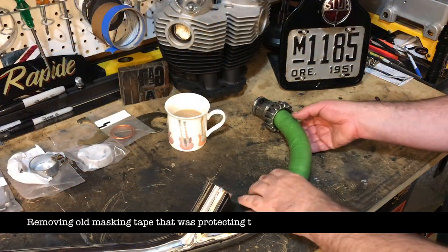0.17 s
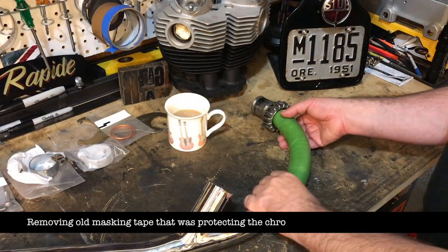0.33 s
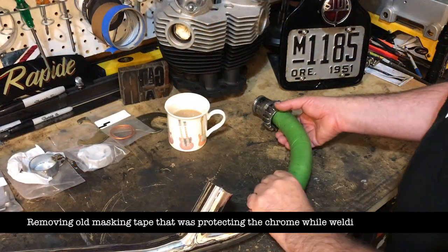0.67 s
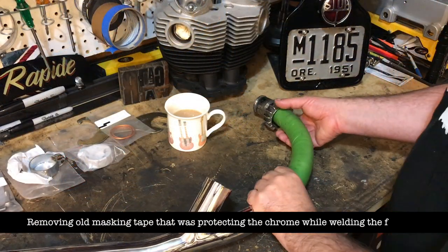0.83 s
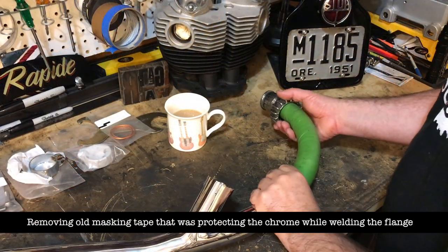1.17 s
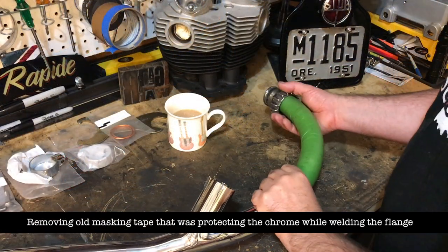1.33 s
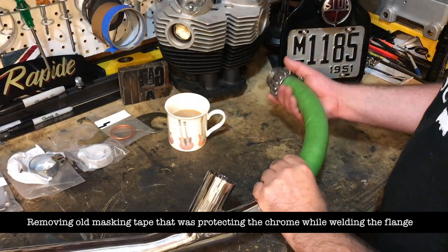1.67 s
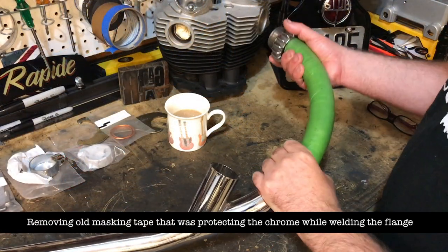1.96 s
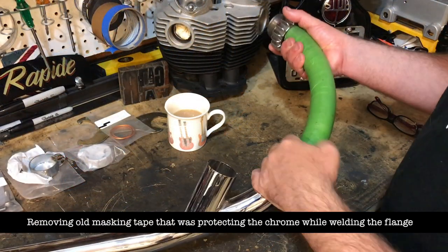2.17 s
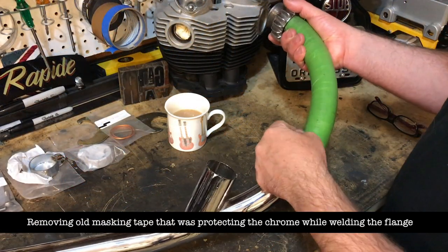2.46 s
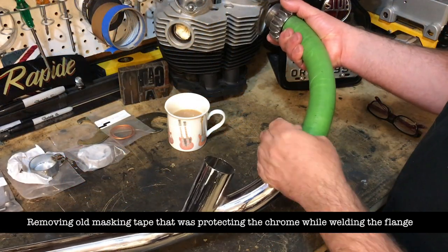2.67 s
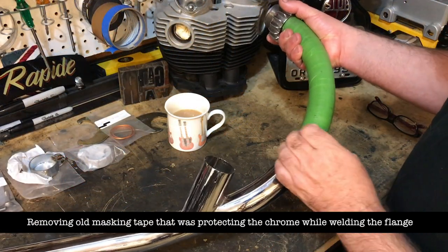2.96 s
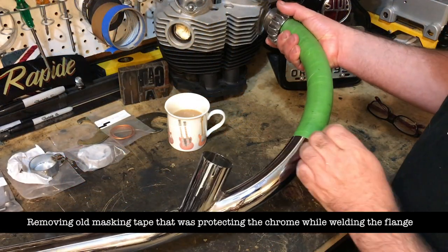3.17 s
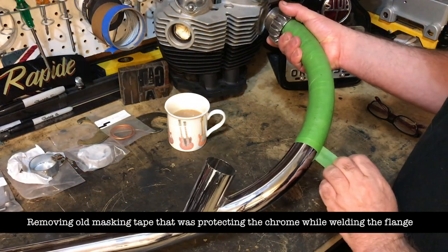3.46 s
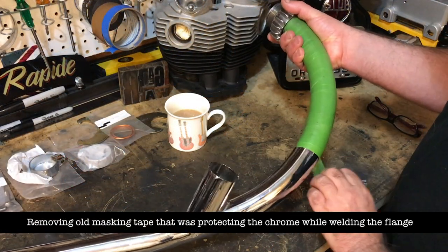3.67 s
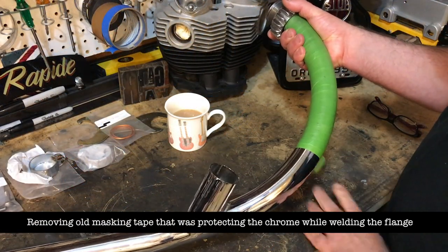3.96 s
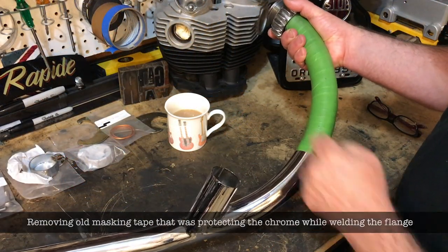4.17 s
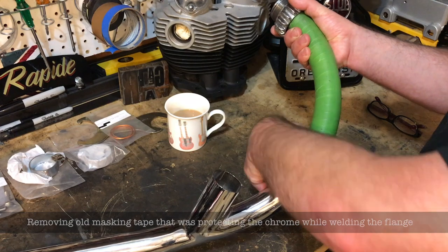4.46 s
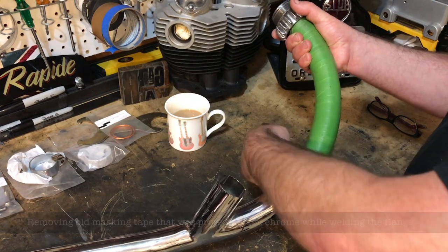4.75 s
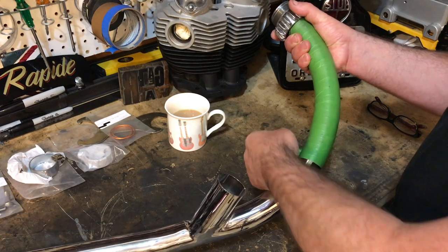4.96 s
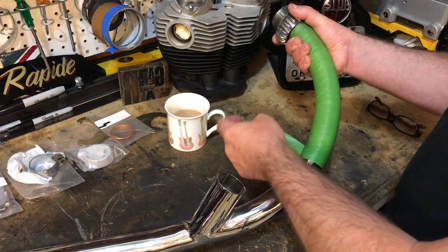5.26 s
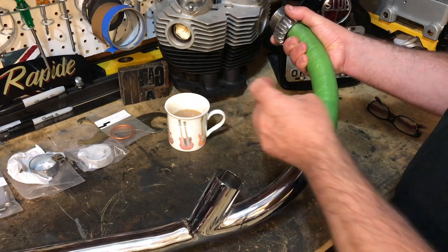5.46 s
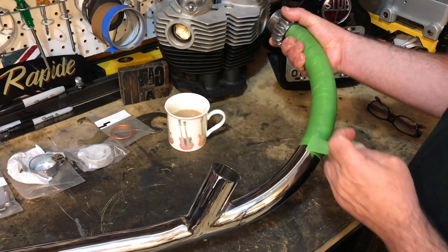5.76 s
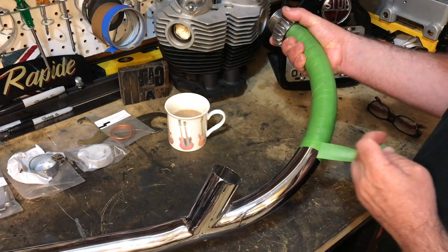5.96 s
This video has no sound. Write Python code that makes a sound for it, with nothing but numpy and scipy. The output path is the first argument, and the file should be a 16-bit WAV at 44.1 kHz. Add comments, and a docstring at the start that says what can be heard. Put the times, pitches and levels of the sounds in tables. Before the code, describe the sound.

A pipe knocks on a workbench and clinks, then old tape rips away from it in two runs of short, rasping pulls.

```python
"""A workbench in a small, quiet workshop; one microphone, close to the work.
Over room air and a deep drone, fingers rub old masking tape on a chromed pipe. The pipe knocks on the
bench, and its loose flange rattles as it is lifted. Fingers pick an edge free, then come the pulls:
glue threads snap by the thousand and ring the freed strip, whose pitch sinks as it lengthens.
Near 3.9 s the tape tears off; at 5 s a fresh end is taken up and peeled."""
import sys
import numpy as np
from scipy import signal
from scipy.fft import rfft, irfft
from scipy.io import wavfile
from scipy.ndimage import uniform_filter1d

SR = 44100
rng = np.random.default_rng(int(sys.argv[2]) if len(sys.argv) > 2 else 0)


def dump(signal):
    """Clip the signal to [-1, 1] and save it as 16-bit WAV at the path in sys.argv[1]."""
    limited = np.clip(np.atleast_2d(signal).T, -1, 1)
    pcm = np.round(limited * 32767).astype(np.int16)
    wavfile.write(sys.argv[1], SR, pcm)


N = 269892
TIME = np.arange(N) / SR

# spectrum of snapping glue threads: freq_hz, density_db
GLUE_SPECTRUM = [(1500, -49), (4000, -17), (6500, -12), (8500, 2.5), (10200, 5.5), (12000, 3.5),
                 (14000, -1), (16000, -7)]
# the hand's tugs at the tape, with rasp and ring relative to the fizz:
# start_s, hold_s, rise_s, fizz_db, growth_db, rasp_db, ring_db, strip_pitch_hz
TAPE_TUGS = [(2.82, 0.13, 0.034, -67.5, -5, -7.5, -15.5, 2970),
             (3.001, 0.087, 0.042, -61, 0.5, -9, -7, 2080), (3.16, 0.13, 0.12, -58, 3.5, -4, -16, 1250),
             (3.398, .1, 0.074, -54, 4, -3, -16.5, 843), (3.6, 0.098, 0.014, -49, 2.5, -4, -18, 810),
             (3.802, 0.16, 0.0096, -67.5, -11, -3, -27.5, 467),
             (5.022, 0.098, 0.022, -61, 4, -4, -21.5, 1740),
             (5.126, .13, 0.02, -48.3, -2, -3.5, -14.5, 1000),
             (5.328, 0.13, 0.041, -58, -1, -3.5, -21, 380), (5.538, 0.19, 0.054, -63.5, -1.5, -6, -23, 444),
             (5.752, 0.061, .03, -66.5, 3.5, -4.5, -19.5, 420),
             (6.014, 0.06, 0.056, -53, -6, -4.5, -19.5, 353)]


def amp(db):
    """Decibels to gain."""
    return 10 ** (np.asarray(db) / 20)


def unit(x):
    """Scales to rms 1."""
    return x / np.sqrt(np.mean(x ** 2) + 1e-20)


def read(points, hz):
    """Reads a table on a log-frequency axis."""
    freq_hz, value = np.transpose(points)
    return np.interp(np.log(hz + 1), np.log(freq_hz + 1), value)


def add(mix, start_s, sound):
    """Mixes a sound in at start_s."""
    part = mix[round(start_s * SR):][:len(sound)]
    part += sound[:len(part)]


def colour(x, spectrum, size=4096):
    """Causal filter of unit energy with the given spectrum."""
    gain_db = np.maximum(read(spectrum, abs(np.fft.fftfreq(size, 1 / SR))), -100)
    minimum_phase = np.exp(np.conj(signal.hilbert(np.log(amp(gain_db)))))
    taps = np.fft.ifft(minimum_phase).real[:size // 2]
    return signal.oaconvolve(x, taps / np.linalg.norm(taps))[:len(x)]


def noise(spectrum):
    """Steady noise of rms 1 from rows of freq_hz, density_db."""
    gain = amp(read(spectrum, np.fft.rfftfreq(N, 1 / SR)))
    return unit(irfft(rfft(rng.standard_normal(N)) * gain, N))


def dying(t60s):
    """One second of noise in which each band dies at its own speed."""
    hz, t, bands = signal.stft(rng.standard_normal(SR), SR, nperseg=256)
    decay = amp(-60 * t / read(t60s, hz)[:, None])
    return signal.istft(bands * decay, SR, nperseg=256)[1][:SR]


def burst(decay_s):
    """A dying scatter of tiny contacts, of unit energy."""
    t = TIME[:SR // 4]
    scatter = rng.standard_normal(len(t)) * np.exp(-t / decay_s)
    return scatter / np.linalg.norm(scatter)


def swell(start_s, length_s):
    """A bell-shaped envelope centred on the given span."""
    return np.exp(-((TIME - start_s) / length_s - .5) ** 2 / 0.48)


def ring(modes):
    """Dying sines of a struck body; neighbouring modes start in opposite directions."""
    t = TIME[:SR]
    return sum((-1) ** k * amp(db - 60 * t / t60) * np.sin(2 * np.pi * hz * t)
               for k, (hz, db, t60) in enumerate(modes))


def resonate(x, hz, width_hz):
    """A steep-skirted resonance whose pitch and width follow curves; rms 1."""
    turn = np.exp(2j * np.pi * np.cumsum(hz) / SR)
    shifted = x / turn * np.sqrt(width_hz)  # the resonance now sits at 0 Hz
    clock = np.cumsum(width_hz) / SR  # time counted in bandwidths, so one low-pass serves every width
    grid = np.arange(0, clock[-1], 1 / 16)
    steps = np.diff(np.interp(grid, clock, np.cumsum(shifted)), prepend=0)
    smooth = signal.lfilter(*signal.butter(2, 1 / 16), steps)
    return unit((turn * np.interp(clock, grid, smooth)).real)


def grains(per_s, spread_db, flutter_db):
    """Tiny snaps of uneven size that come in clumps."""
    sizes = amp(spread_db * np.minimum(rng.exponential(1, N), 4)) * rng.choice([-1, 1], N)
    clumps = unit(uniform_filter1d(uniform_filter1d(rng.standard_normal(N), size=180), size=120))
    fires = rng.random(N) < per_s / SR
    return unit(sizes * fires * amp(flutter_db * clumps))


def room_tone():
    """Room air, slow pressure drift, a faint whirr and a deep, wavering drone."""
    # the air and its slow pressure drift: freq_hz, density_db
    air_spectrum = [(30, -24.5), (50, -17.5), (70, -17), (100, -18), (150, -25), (220, -27.5), (400, -35),
                    (650, -37.5), (900, -39), (1800, -40.5), (2700, -43.5), (10000, -45.5), (16000, -51.5)]
    drift_spectrum = [(3, -12), (10, 0), (18, -8), (28, -14.5), (40, -35), (100, -65)]
    # the drone dips or swells for a while: start_s, length_s, change_db
    drone_swells = [(1.198, 1.2, -4), (2.49, 0.43, 4.5), (4.12, .16, 5.5)]
    drone_hz = 30 + 1.01 * noise([(1, 0), (4, -6), (10, -40), (30, -120)])
    wander_db = 2.5 * noise([(1, 0), (4, -3), (8, -40), (30, -120)])
    surge_db = sum(db * swell(start_s, length_s) for start_s, length_s, db in drone_swells)
    drone = np.sqrt(2) * np.sin(2 * np.pi * np.cumsum(drone_hz) / SR)
    drone *= amp(-57.5 + surge_db + wander_db)
    drift = amp(-55.5) * noise(drift_spectrum)
    whirr = amp(-89.5) * resonate(rng.standard_normal(N), hz=np.full(N, 722), width_hz=np.full(N, 25.))
    return amp(-71) * noise(air_spectrum) + drift + whirr + drone


def fingers():
    """Skin slides over the crepe paper, then picks at its edge, where the glue adds a bright fizz."""
    # finger strokes on the tape: start_s, length_s, level_db, glue_power_share (0-1)
    rubs = [(0.128, 0.44, -74, 0), (1.11, 0.064, -72, 0.66), (2.088, 0.045, -76.5, 0.9),
            (2.287, 0.027, -74, 1), (2.367, 0.056, -74.5, 0.5), (2.458, 0.033, -71.5, 0.45),
            (2.549, .035, -68.5, 0.84), (2.61, 0.044, -66.5, 0.85), (2.695, 0.059, -57.5, 0.95),
            (4.078, 0.086, -68.5, 0.34), (4.433, 0.042, -64, 0.63), (4.61, 0.022, -66.5, 0.2),
            (4.654, 0.03, -70, 0), (4.77, 0.23, -70.5, 0.46), (5.668, 0.032, -57.5, 0.88)]
    # crackles as a new edge lifts: start_s, level_db, length_s
    crackles = [(2.572, -72, 0.01), (3.586, -58, 0.01), (4.383, -64, 0.0036), (4.591, -65, 0.004),
                (4.745, -56, 0.019), (4.759, -57.5, 0.04), (4.861, -57.5, 0.0095), (4.891, -56, 0.009)]
    # skin on paper, and the lifting edge: freq_hz, density_db
    skin_spectrum = [(240, -27), (400, 3.5), (730, -15.5), (1040, -15), (1220, -7.5), (3020, -5),
                     (10900, 0), (16000, -14.5)]
    edge_spectrum = [(290, -45), (500, -22), (1360, -5.5), (1510, -5), (2390, -15), (2690, -15),
                     (7210, 0.5), (12100, 1), (16000, -14)]
    grit = grains(per_s=4700, spread_db=2.0, flutter_db=0.5)
    tack = grains(per_s=3000, spread_db=-0.5, flutter_db=1.6)
    skin, glue = colour(grit, skin_spectrum), colour(tack, GLUE_SPECTRUM)
    picks = sum(amp(db) * swell(start_s, length_s) for start_s, db, length_s in crackles)
    out = picks * colour(grit, edge_spectrum)
    for start_s, length_s, db, sticky in rubs:
        out += amp(db) * swell(start_s, length_s) * (np.sqrt(1 - sticky) * skin + np.sqrt(sticky) * glue)
    return out


def bench_knock():
    """The pipe rings the bench as it lands; the things lying on it jump and blur the tail."""
    # the pipe lands and settles: start_s, relative_db
    knocks = [(.464, 3), (0.47, 1), (0.4827, -7.5)]
    # modes of bench and pipe: pitch_hz, relative_db, t60_s
    bench_modes = [(76.4, -37, 0.64), (92.7, -40, 0.35), (129.5, -38, 0.32), (147, -39.5, 0.36),
                   (186, -52.5, 0.82), (223, -36.5, 0.21), (282.6, -41.5, 0.51), (318.3, -30.5, 0.22),
                   (362, -67, 0.38), (467, -35, 0.12), (486, -54, 0.8), (534, -45.5, 0.32), (597, -50, 0.2),
                   (631, -41.5, 0.12), (767, -56.5, 0.62), (1740, -55.5, 0.25), (2030, -72, 0.91),
                   (2890, -66.5, 0.7), (3893, -54, 0.091), (6560, -61, 0.15), (9900, -62, 0.11)]
    # the thud's spectrum: freq_hz, density_db
    thud_spectrum = [(35, -17), (70, 2), (110, 5), (180, -12), (300, -6), (400, -13), (615, -16),
                     (900, -23.5), (1350, -31.5), (1800, -27.5), (2500, -34), (3500, -32), (7000, -42),
                     (10200, -42), (14000, -60)]
    # the thud's decay: freq_hz, t60_s
    thud_decay = [(80, 0.32), (400, 0.63), (1500, 0.59), (5000, 0.26), (12000, 0.23)]
    blow, thud = np.zeros(N), np.zeros(N)
    add(blow, knocks[0][0], amp(-0.5) * ring(bench_modes))
    for start_s, db in knocks:
        add(thud, start_s, amp(db - 41.5) * dying(thud_decay))
    return blow + colour(thud, thud_spectrum)


def handling():
    """Hands and pipe bump softly, low in pitch."""
    # the bumps: start_s, length_s, level_db
    bumps = [(1.077, 0.12, -71.5), (1.37, 0.073, -77), (1.772, 0.064, -59.5), (1.883, 0.12, -63),
             (4.75, 0.094, -65.5)]
    # their spectrum: freq_hz, density_db
    bump_spectrum = [(40, -13), (65, -7), (110, 6), (160, -16), (250, -23.5), (500, -30), (1000, -47)]
    envelope = sum(amp(db) * swell(start_s, length_s) for start_s, length_s, db in bumps)
    return envelope * noise(bump_spectrum)


def flange():
    """The loose ring chatters and scrapes on the pipe, hand-damped: bright on metal, dull on tape."""
    # flange hits pipe, at relative levels: start_s, ring_db, clack_db, chatter_s
    clinks = [(1.3444, -47, -67, 0.0048), (1.3669, -43, -73, 0.002), (1.379, -46, -54.5, 0.0087),
              (1.39, -52.5, -71, 0.0053), (1.415, -47, -70, 0.0031), (1.445, -55.5, -61.5, 0.011),
              (1.469, -76, -56.5, 0.019), (1.486, -62, -54.5, 0.0046), (1.521, -62, -57.5, 0.0033),
              (1.554, -58.5, -50.5, 0.0083), (1.568, -84, -53, 0.0041), (1.902, -70, -56, 0.0016),
              (1.911, -66, -81, 0.0012)]
    # modes of the flange: pitch_hz, relative_db, t60_s
    flange_modes = [(580, -14.5, 0.45), (1969, -15, 0.4), (2830, -19.5, 0.77), (3266, -10.5, 0.13),
                    (4280, -9.5, 0.071), (5200, -8, .06), (6130, -13, 0.06), (7080, -4.5, 0.081),
                    (8560, -8, 0.11), (8700, -3, 0.03), (9390, 8.5, 0.032), (9550, -15, .035),
                    (9970, 0, 0.026), (12650, -1, 0.055), (13200, -15, .02), (14060, -1, 0.025)]
    # a dull hit on tape: freq_hz, density_db
    clack_spectrum = [(150, -32), (250, -10), (760, -3), (1300, -3), (1980, -8), (2310, -14.5), (3340, -7),
                      (3960, -19), (4230, -7), (5100, -8.5), (5640, -15), (7900, -20.5), (9670, -14),
                      (11600, -21), (14000, -40)]
    # scrapes along the pipe: start_s, level_db, length_s, pitch_hz, width_hz
    scrapes = [(1.382, -55.5, 0.017, 3140, 790), (1.412, -66, 0.034, 3100, 900),
               (1.48, -56, 0.018, 1890, 382), (1.52, -63, 0.03, 297, 110), (1.558, -53.5, 0.022, 1924, 334)]
    rings, clacks = np.zeros(N), np.zeros(N)
    for start_s, ring_db, clack_db, chatter_s in clinks:
        contact = 0.56 * signal.unit_impulse(SR // 4) + 0.81 * burst(chatter_s + 0.002)
        add(rings, start_s, amp(ring_db - 5.0) * signal.fftconvolve(contact, ring(flange_modes)))
        add(clacks, start_s, amp(clack_db + 25.5) * burst(chatter_s + 0.0061))
    rubbed_metal = unit(signal.oaconvolve(rng.standard_normal(N), ring(flange_modes))[:N])
    slide = amp(-67) * swell(start_s=1.315, length_s=0.045) * rubbed_metal  # it slides before it strikes
    return rings + slide + colour(clacks, clack_spectrum) + friction(scrapes)


def friction(strokes, sag_octaves_per_s=0):
    """Short strokes of sticking and slipping, each in one resonance that may sink."""
    grit = grains(per_s=5200, spread_db=-2.5, flutter_db=1)
    out = np.zeros(N)
    for start_s, db, length_s, hz, width_hz in strokes:
        pitch_hz = hz * 2 ** (-sag_octaves_per_s * np.clip(TIME - start_s, -length_s, 2 * length_s))
        out += amp(db) * swell(start_s, length_s) * resonate(grit, pitch_hz, np.full(N, width_hz))
    return out


def tape_snaps():
    """The tape parts with a sharp crack, and the slack end flaps."""
    # the snaps, at relative levels: start_s, crack_db, flap_db, flap_pitch_hz
    snaps = [(2.703, -76, -58, 397), (3.897, -31, -45.5, 1160), (3.8988, -36.5, -47, 1510),
             (4.0004, -45, -44, 1120), (4.757, -69, -47.5, 1100), (4.783, -66, -54, 325),
             (5.692, -61, -49.5, 810)]
    # the crack's spectrum: freq_hz, density_db
    crack_spectrum = [(600, -36), (1100, -22), (2400, -16), (4000, 3), (5900, 3.5), (8500, 7),
                      (11000, -0.5), (13300, 5), (16000, -11)]
    # the flap's spectrum: pitch_ratio, density_db
    flap_shape = [(.3, -27), (.7, -7), (1, 4.5), (1.4, -4), (1.9, 0.5), (2.8, -14), (8, -53)]
    cracks, flaps = np.zeros(N), np.zeros(N)
    for start_s, crack_db, flap_db, hz in snaps:
        crack = signal.unit_impulse(SR // 4) + .5 * burst(decay_s=0.0044)
        flap = colour(burst(decay_s=0.0041), [(ratio * hz, db) for ratio, db in flap_shape])
        add(cracks, start_s, amp(crack_db + 11.5) * crack)
        add(flaps, start_s, amp(flap_db + 11.5) * flap)
    return colour(cracks, crack_spectrum) + flaps


def tug(start_s, hold_s, rise_s, release_s=0.035):
    """The hand's pull, 0-1: it builds up to start_s, holds, then eases."""
    attack = np.maximum(start_s - TIME, 0) / rise_s
    release = np.maximum(TIME - start_s - hold_s, 0) / release_s
    return np.exp(-np.minimum(attack + release, 20))


def freed_strip():
    """The strip rings at a pitch that goes as one over its length, so it sinks as tape comes free."""
    # resonances of the strip: pitch_ratio, width_share_of_pitch, relative_db
    strip_modes = [(1, .24, 5), (1.049, 1.0, -4.5), (2.3, .3, -15), (3.4, 0.21, -8)]
    starts_s, *_, pitches_hz = np.transpose(TAPE_TUGS)
    lowest_hz = 1 / np.interp(TIME, starts_s, 1 / pitches_hz)
    grip_loss_hz, paper_cutoff_hz = 119.4, 3240  # fingers widen each resonance; paper damps the top
    strip = np.zeros(N)
    for ratio, width_share, db in strip_modes:
        hz = ratio * lowest_hz
        slips = grains(per_s=2500, spread_db=0.0, flutter_db=2.5)
        damping = np.sqrt(1 + (hz / paper_cutoff_hz) ** 6)
        strip += amp(db) * resonate(slips, hz, width_share * hz + grip_loss_hz) / damping
    tension_waver_db = 0.43 * noise([(2, 7), (18, 2), (40, -25), (100, -120)])
    return strip * amp(tension_waver_db)


def peel():
    """With each tug, glue threads fizz and ring the pipe, paper fibres rasp and the taut strip sounds."""
    # modes of the pipe under the peel: pitch_hz, relative_db, t60_s
    pipe_modes = [(2880, -13, 0.047), (4225, -3, 0.036), (4470, -27, 0.045), (5014, -5.5, 0.068),
                  (5200, 4, 0.01), (6080, -6.5, 0.041), (7120, -7.5, .04), (7540, -1.5, .04),
                  (8300, -5, 0.032), (9240, -2, 0.017), (10150, 1, 0.035), (10550, -5, 0.036),
                  (10910, 1.5, 0.049)]
    # glue squeaks where it holds fast: start_s, level_db, length_s, pitch_hz, width_hz
    squeaks = [(3.24, -66, 0.077, 2500, 263), (5.33, -70.5, 0.12, 2720, 262), (5.48, -80, 0.09, 2560, 244),
               (5.535, -65, 0.031, 5830, 700), (6.01, -69, 0.077, 1220, 290)]
    threads = grains(per_s=5000, spread_db=1.5, flutter_db=0.5)
    fibres = grains(per_s=3500, spread_db=0.0, flutter_db=1.4)
    plucks = grains(per_s=4000, spread_db=4.0, flutter_db=4.5)
    pipe = unit(signal.oaconvolve(plucks, ring(pipe_modes))[:N])
    fizz = unit(colour(threads, GLUE_SPECTRUM)) + amp(-7.5) * pipe
    # rasping paper fibres: freq_hz, density_db
    rasp_spectrum = [(500, -32), (1300, -7), (2000, -6), (3200, -4.5), (4600, -1.5), (6500, -0.5),
                     (9000, -4), (15000, -32)]
    rasp = unit(colour(fibres, rasp_spectrum))
    power = np.zeros((3, N))  # of fizz, rasp and strip; overlapping tugs add up
    for start_s, hold_s, rise_s, db, growth_db, rasp_db, ring_db, _ in TAPE_TUGS:
        pull = tug(start_s, hold_s, rise_s)
        tautness = pull ** 1.28  # the strip rings only while taut
        progress = np.clip((TIME - start_s) / hold_s, 0, 1)
        strength = amp(db + growth_db * (progress - .5))
        power += (strength * np.array([pull, amp(rasp_db) * pull, amp(ring_db) * tautness])) ** 2
    peeling = (np.sqrt(power) * [fizz, rasp, freed_strip()]).sum(0)
    return peeling + friction(squeaks, sag_octaves_per_s=1.0)  # squeaks sink as the strip lengthens


def workshop(x, wet_db):
    """The direct sound reaches the microphone, then echoes off the bench and the room's short tail."""
    # echoes off the bench top and the things on it: delay_s, level_db
    echoes = [(.0009, -42), (.0026, -21), (.0043, -17.5), (.0098, -12.5)]
    # the room's decay: freq_hz, t60_s
    room_decay = [(100, 0.54), (1000, 0.62), (5000, 0.46), (14000, 0.31)]
    tail = dying(room_decay) * (TIME[:SR] > .004)
    response = signal.unit_impulse(SR) + amp(wet_db) * tail / np.linalg.norm(tail)
    for delay_s, db in echoes:
        add(response, delay_s, amp([db]))
    return signal.fftconvolve(x, response / np.linalg.norm(response))[:N]


def scene():
    """Everything on the bench, heard by one microphone."""
    tape = workshop(peel() + fingers(), wet_db=-9.0) + workshop(tape_snaps(), wet_db=-10.0)
    metal = workshop(flange(), wet_db=-5.5) + bench_knock()
    return (tape + metal + room_tone() + handling())[None]


def record(dry):
    """The recorder's band limit: a steep low-pass at 15.9 kHz."""
    lowpass = signal.firwin(511, 15900, window=("kaiser", 8), fs=SR)
    return signal.oaconvolve(dry, lowpass[None], "same")


dry = scene()
out = record(dry)
dump(out)
```